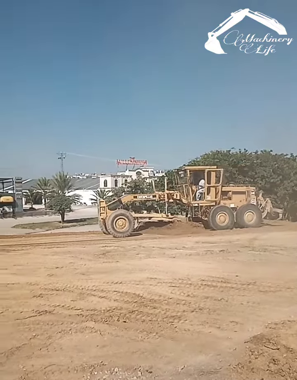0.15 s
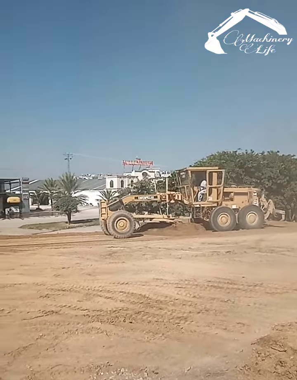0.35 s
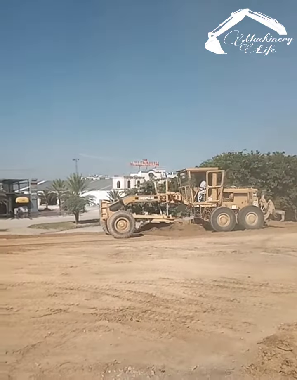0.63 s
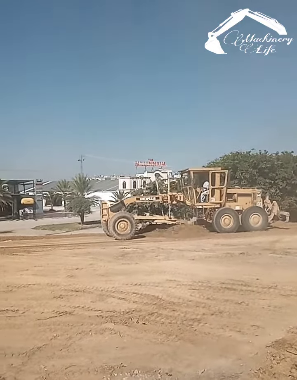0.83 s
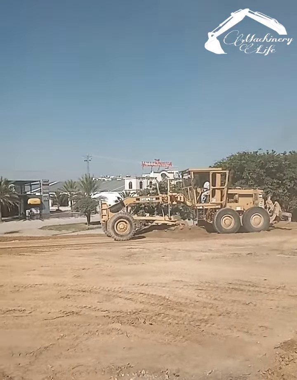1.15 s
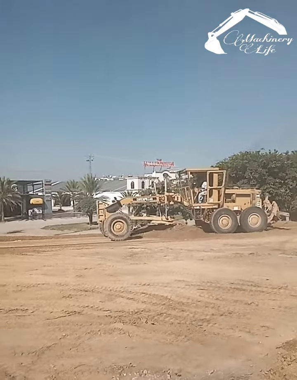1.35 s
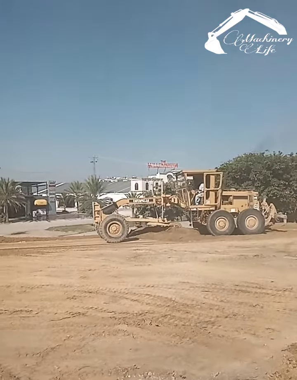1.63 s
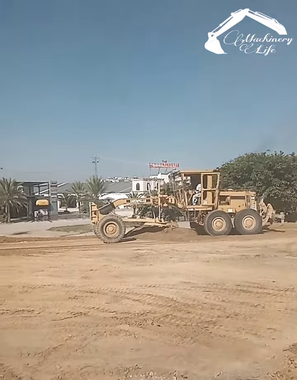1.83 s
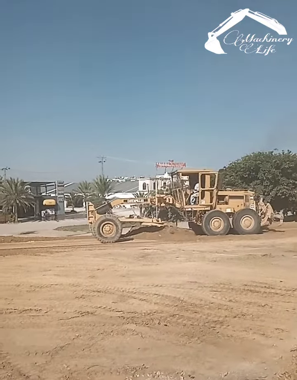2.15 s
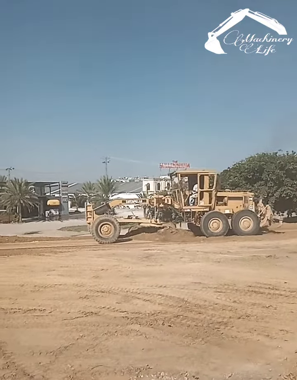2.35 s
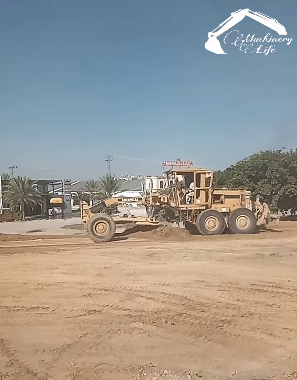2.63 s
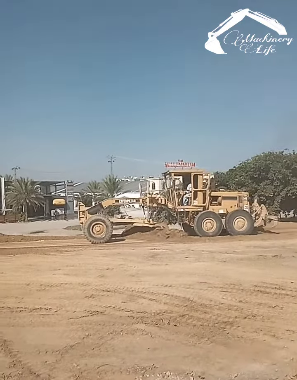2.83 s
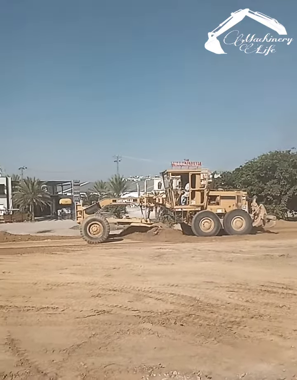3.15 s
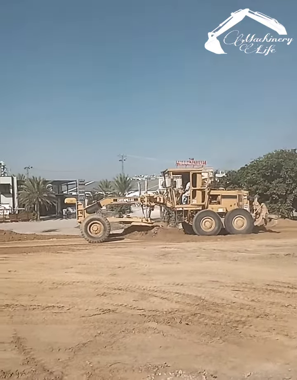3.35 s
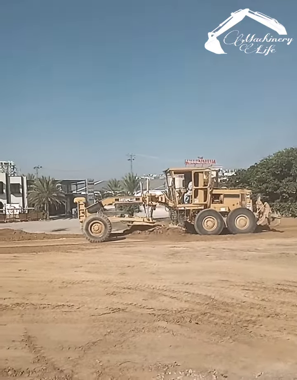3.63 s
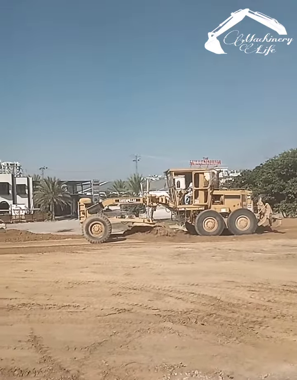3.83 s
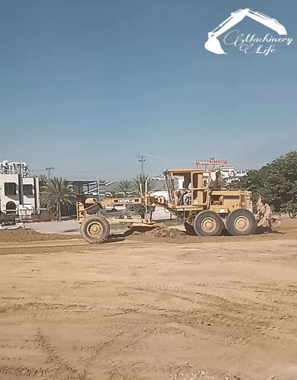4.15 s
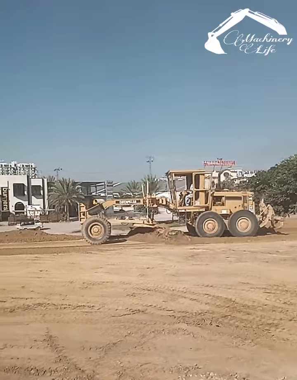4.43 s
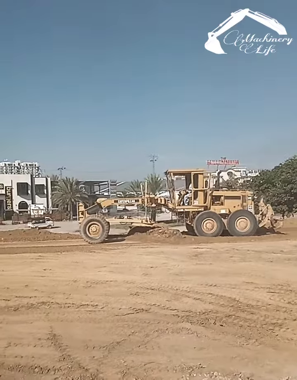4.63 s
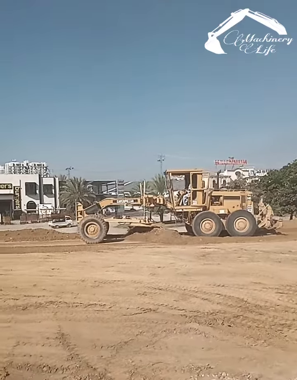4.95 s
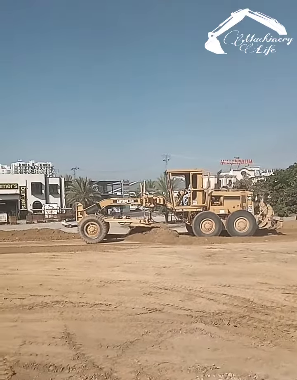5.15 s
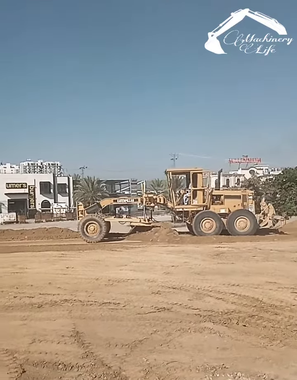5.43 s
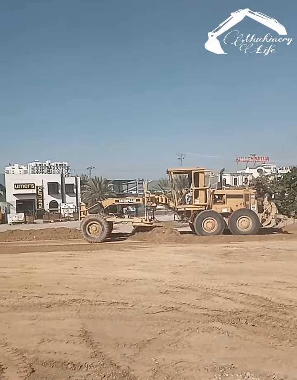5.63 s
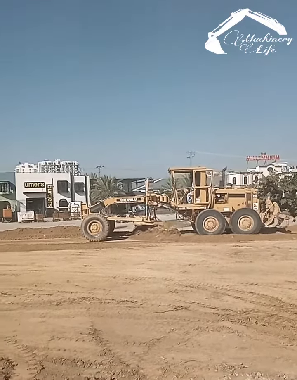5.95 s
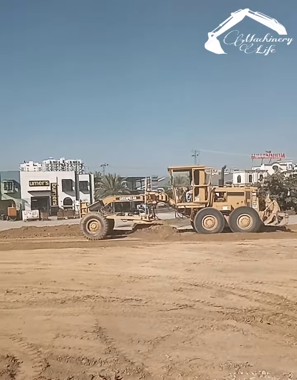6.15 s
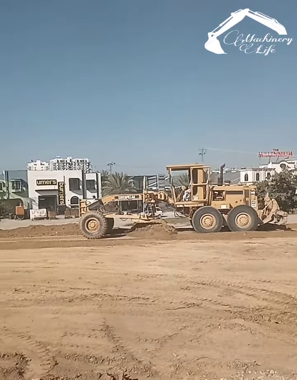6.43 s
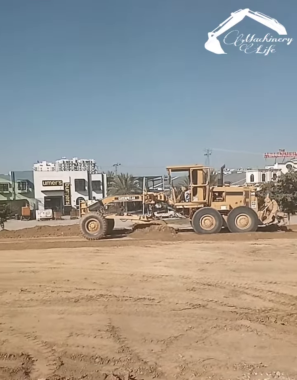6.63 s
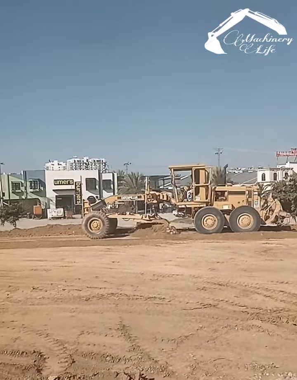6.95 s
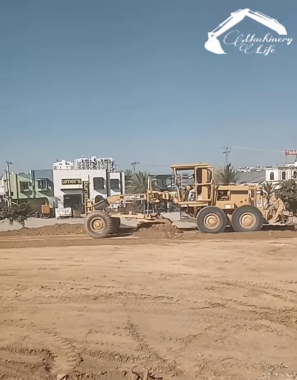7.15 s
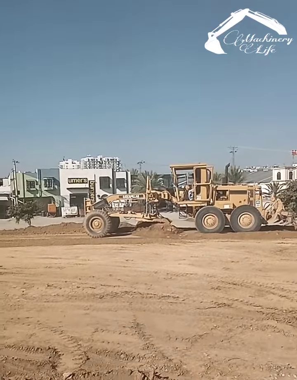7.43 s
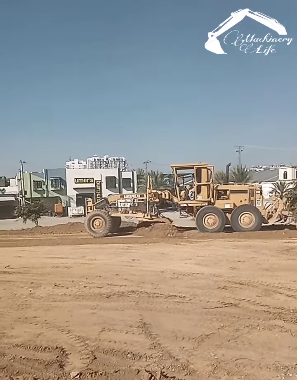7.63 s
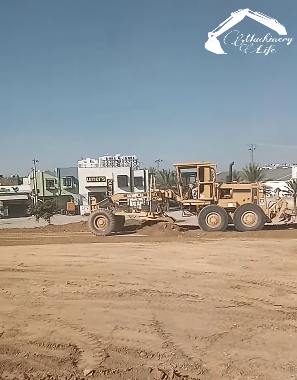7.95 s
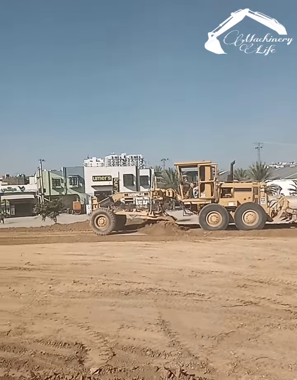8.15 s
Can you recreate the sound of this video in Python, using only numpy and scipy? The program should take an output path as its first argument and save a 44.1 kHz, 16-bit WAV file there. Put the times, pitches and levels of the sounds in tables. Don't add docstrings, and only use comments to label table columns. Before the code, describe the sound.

Road grader working dirt outdoors: dull bass hum and gust bumps at first, suddenly turning into a loud, bright, clattering engine roar that holds steady.

```python
import sys
import numpy as np
from scipy import signal
from scipy.fft import rfft, irfft
from scipy.io import wavfile
from scipy.ndimage import uniform_filter1d

SR = 44100
rng = np.random.default_rng(int(sys.argv[2]) if len(sys.argv) > 2 else 0)


def volts_from_decibels(level):
    exponent = np.asarray(level, float) / 20
    return 10 ** exponent


def log_audio(samples):
    frames = np.atleast_2d(samples).T
    limited = np.clip(frames, -1, 1)
    pcm = np.round(limited * 32767).astype(np.int16)
    wavfile.write(sys.argv[1], SR, pcm)


N = 365148

# frequency in Hz, density in dB per Hz.
HISS_SPECTRUM = [(3000, -8.5), (10700, -3.5), (11400, 8.5), (12000, 0.5), (15200, -4), (16000, -5)]
# frequency in Hz, density in dB per Hz.
RUMBLE_SPECTRUM = [(15, -21), (30, -24), (45, -3), (60, -6), (80, 10), (110, 7.5), (140, -45)]
# start in seconds, peak in dB, first pitch in Hz, length in seconds.
GUST_KNOCKS = [(0.148, -11.5, 356, .011), (0.16, -14.5, 91, 0.024), (1.21, -30, 200, 0.018),
               (1.824, -19, 124, 0.028), (1.908, -10, 255, 0.0063), (1.915, -22, 286, 0.014),
               (1.922, -7.5, 129, 0.024), (2.719, -21, 154, .02), (3.21, -16, 216, .024),
               (3.403, -22, 190, 0.018), (4.533, -15, 130, .02)]
# start in seconds, peak in dB.
GRIT_TICKS = [
    (0.3955, -18),
    (2.797, -21),
    (3.9035, -15),
    (4.0589, -19.5),
]
# time in seconds, firing rate in Hz.
FIRING_RATE = [(0.06, 80.3), (0.89, 78.3), (1.07, 76.0), (1.32, 75.8), (1.59, 81.9), (1.75, 82.8),
               (2.33, 82.9), (2.72, 80.2), (3.28, 80.0), (3.69, 76.4), (4.45, 74.6), (4.7, 74.7),
               (4.88, 80.2), (4.99, 81.4), (8.15, 81.3)]
CYLINDER_DB = [0.5, -6.5, 1, -4.2, -3.5, -15.5]
# time in seconds, clatter level in dB.
FILTER_PASSAGE = [(0, -47), (.35, -48.5), (.62, -56.5), (1.78, -56.5), (2.7, -50.5), (3.0, -53),
                  (4.25, -53), (4.5, -44.5), (4.97, -40), (5.02, -33), (5.13, -31), (5.22, -24.5),
                  (5.32, -27), (5.42, -23.5), (5.75, -24), (6.4, -24.5), (6.7, -23), (8.28, -23)]
FILTER_BAND_HZ = [270, 650, 1700, 2250, 2700, 4000, 6000]
# gain at full grip in dB, exponent of the grip (no unit).
FILTER_BAND_CUT = [(-12, 3.12), (-23, 1.1), (-34.5, 0.94), (-48, 0.99), (-64.5, 0.97), (-62, 0.69),
                   (-62, 0.85)]
# frequency in Hz, density in dB per Hz.
LEAK_SPECTRUM = [(2150, -28.5), (2560, -17), (2760, -7), (2950, -0.5), (3150, 0), (3450, -5), (3750, -18),
                 (4130, -27.5), (4450, -21.5), (4700, -22.5), (5050, -35.5), (5600, -39), (6000, -35.5),
                 (7000, -47.5)]
# frequency in Hz, density in dB per Hz.
HEAD_SPECTRUM = [(1500, -44), (1800, -4.5), (1880, 14), (1925, 17.5), (1990, 11), (2080, -13), (2500, -59)]
# multiple (no unit), level in dB.
ENGINE_ORDERS = [(4, -29), (5, -21.5), (7, -16), (8, -21), (9, -19), (10, -12.5), (12, -20.5), (13, -21.5),
                 (14, -18), (15, -16), (16, -21), (18, -22), (20, -27)]
# frequency in Hz, density in dB per Hz.
ROAR_SPECTRUM = [(56, -35.5), (95, -5.5), (110, -8), (200, -10), (425, -14), (620, -10), (900, -10.5),
                 (1350, -11), (1700, -11), (2100, -10.5), (2550, -13), (3300, -17.5)]
# frequency in Hz, gain in dB.
MIC_TREBLE = [(3300, 3.5), (3900, -7.5), (4300, -8), (4650, -18), (5000, -26), (5620, -35.5), (5880, -33.5),
              (6500, -32), (7300, -44), (7800, -53), (9200, -54.5), (10500, -54.5), (13000, -52),
              (14600, -54)]
# centre in Hz, width in Hz, lift in dB.
PANEL_MODES = [(525, 68, 5), (1097, 120, 4.5), (200, 84, 1)]
# time in seconds, level in dB.
EXHAUST_LEVEL = [(0.0, -27.5), (0.37, -27), (0.64, -30.5), (0.9, -32), (1.2, -29), (1.75, -30.5),
                 (2.05, -29.5), (2.24, -29.5), (2.95, -26.5), (3.2, -29), (4.34, -24.5), (4.54, -20),
                 (4.73, -23.5), (4.93, -23), (5.37, -24.5), (6.11, -22), (8.28, -22.5)]


def in_time(rows, times):
    seconds, values = np.transpose(rows)
    return np.interp(times, seconds, values)


def at_hz(points, hz):
    points_hz, points_db = np.transpose(points)
    return np.interp(np.log(hz + 1), np.log(points_hz), points_db)


def rms_one(x):
    return x / np.sqrt(np.mean(x ** 2) + 1e-20)


def drift(rate_hz):
    pole = np.exp(-2 * np.pi * rate_hz * 40 / SR)
    white = rng.standard_normal(N // 40 + 2002)
    slow = signal.lfilter([1], [1, -2 * pole, pole * pole], white)[2000:]
    return np.interp(np.arange(N) / 40, np.arange(len(slow)), rms_one(slow))


def coloured(x, spectra, peaks=()):
    hz = np.fft.rfftfreq(N, 1 / SR)
    gain = volts_from_decibels(sum(at_hz(points, hz) for points in spectra))
    for centre_hz, width_hz, lift_db in peaks:
        resonance = 1 / (1 + (2 * (hz - centre_hz) / width_hz) ** 2)
        gain = gain * (1 + (volts_from_decibels(lift_db) - 1) * resonance)
    return rms_one(irfft(rfft(x) * gain, N))


def hiss():
    return volts_from_decibels(-94.5) * coloured(rng.standard_normal(N), [HISS_SPECTRUM])


def rumble(note_db):
    lumps = volts_from_decibels(1.2 * drift(5)) * rng.standard_normal(N)
    level_db = -43 + 0.97 * (note_db + 8.5)
    return volts_from_decibels(level_db) * coloured(lumps, [RUMBLE_SPECTRUM])


def knocks():
    end_hz = 83
    out = np.zeros(N)
    for start, peak_db, first_hz, length in GUST_KNOCKS:
        u = np.arange(int(length * SR)) / (length * SR)
        hz = end_hz + (first_hz - end_hz) * np.exp(-2.4 * u)
        envelope = np.sin(np.pi * u ** 0.48)
        swing = envelope * np.sin(2 * np.pi * np.cumsum(hz) / SR)
        out[int(start * SR):][:len(u)] += volts_from_decibels(peak_db) * swing
    return signal.sosfilt(signal.butter(2, 1300, fs=SR, output="sos"), out + 1e-18)


def ticks(fall_hz, lift_db):
    steps = np.zeros(N)
    for start, peak_db in GRIT_TICKS:
        steps[round(start * SR)] = volts_from_decibels(peak_db + lift_db)
    sag = signal.lfilter([1], [1, -np.exp(-2 * np.pi * fall_hz / SR)], steps + 1e-18)
    return signal.sosfilt(signal.butter(7, 3900, fs=SR, output="sos"), sag)


def filter_grip(times):
    open_db, shut_db = -23, -56
    passed_db = in_time(FILTER_PASSAGE, times)
    return np.clip((open_db - passed_db) / (open_db - shut_db), 1e-4, 1.2)


def patchy(frames, spread_db):
    flicker = rng.standard_normal(frames.shape)
    flicker = uniform_filter1d(flicker, size=4, axis=0)
    flicker = uniform_filter1d(flicker, size=3, axis=1)
    return frames * volts_from_decibels(spread_db * rms_one(flicker))


def wind_filter(x, leak_noise):
    hz, times, (frames, passed) = signal.stft([x, leak_noise], SR, nperseg=1024)
    grip = filter_grip(times)
    cut_db = np.array([full_db * grip ** power for full_db, power in FILTER_BAND_CUT])
    bands = np.arange(len(FILTER_BAND_HZ))
    place = np.interp(np.log(hz + 1), np.log(FILTER_BAND_HZ), bands)
    share = np.maximum(1 - abs(place[:, None] - bands), 0)
    gain_db = share @ cut_db
    muffled = patchy(frames * volts_from_decibels(gain_db), 0.8 + 0.041 * abs(gain_db))
    frames = muffled + patchy(passed, spread_db=3.5)
    return signal.istft(frames, SR, nperseg=1024)[1][:N]


def firing_gate(firings, depth, scatter_db):
    stroke = firings.astype(int)
    chance_db = scatter_db * rng.standard_normal(N // 400)[stroke]
    strength_db = np.array(CYLINDER_DB)[stroke % 6] + chance_db
    return 1 + depth * volts_from_decibels(strength_db) * np.exp(-2.5 * (firings % 1))


def leak(firings):
    swell_db = 2.2 * np.cos(2 * np.pi * firings / 6)
    gate = firing_gate(firings, depth=0.64, scatter_db=6.5) * volts_from_decibels(0.53 * drift(15) + swell_db)
    return volts_from_decibels(-64.5) * coloured(gate * rng.standard_normal(N), [LEAK_SPECTRUM])


def ring_level(open_db, cut_db, power, follows, load_db):
    grip = filter_grip(np.arange(N) / SR)
    return open_db + cut_db * grip ** power + follows * load_db


def head_upper_ring(firings, load_db):
    level_db = ring_level(-39, -25.5, power=1.4, follows=1.9, load_db=load_db)
    beat_db = 3.5 * np.cos(2 * np.pi * firings / 6 + 0.4)
    mode = (1999, 1.5 * 82, 60)
    return volts_from_decibels(level_db + beat_db) * coloured(rng.standard_normal(N), [], [mode, mode])


def bonnet_ring(firings, load_db):
    level_db = ring_level(-31, -21, power=1.5, follows=1, load_db=load_db)
    beat_db = 2.2 * np.cos(2 * np.pi * firings / 6 + 1.3)
    mode = (506.3, 1.5 * 45, 45)
    return volts_from_decibels(level_db + beat_db) * coloured(rng.standard_normal(N), [], [mode, mode])


def head_ring(firings, load_db):
    level_db = ring_level(-31, -54, power=1.7, follows=0.9, load_db=load_db)
    swell_db = 1.4 * np.cos(2 * np.pi * firings / 6) + 2.3 * np.cos(2 * np.pi * firings / 3)
    return volts_from_decibels(level_db) * coloured(volts_from_decibels(swell_db) * rng.standard_normal(N), [HEAD_SPECTRUM])


def gear_whine():
    mesh_hz = 1611
    level = np.sqrt(2) * volts_from_decibels(-43.5 + 2.5 * drift(2))
    return level * np.sin(2 * np.pi * mesh_hz * np.arange(N) / SR + 0.8 * drift(14))


def order_tones(firings):
    out = 0
    for multiple, level_db in ENGINE_ORDERS:
        phase = 2 * np.pi * (multiple * firings / 6 + rng.random()) + 0.5 * drift(3.3)
        out = out + volts_from_decibels(level_db + 2.4 * drift(0.4)) * np.sin(phase)
    return np.sqrt(2) * volts_from_decibels(-22) * out


def roar(firings):
    gate = firing_gate(firings, depth=0.38, scatter_db=3.5) * volts_from_decibels(0.45 * drift(18))
    noise = gate * rng.standard_normal(N)
    return volts_from_decibels(-21.5) * coloured(noise, [ROAR_SPECTRUM, MIC_TREBLE], PANEL_MODES)


def exhaust_note(firings, note_db):
    throb_db = 1.2 * np.sin(2 * np.pi * firings / 6) + 0.98 * drift(36)
    level = np.sqrt(2) * volts_from_decibels(note_db + throb_db)
    return level * np.sin(2 * np.pi * firings + 0.27 * drift(8.4))


def scene():
    times = np.arange(N) / SR
    firings = np.cumsum(in_time(FIRING_RATE, times)) / SR
    note_db = in_time(EXHAUST_LEVEL, times)
    load_db = uniform_filter1d(note_db, size=30000) + 22
    near = rumble(note_db) + knocks() + ticks(fall_hz=400, lift_db=2.0)
    clatter = gear_whine() + order_tones(firings) + roar(firings)
    engine = wind_filter(clatter, leak(firings))
    rings = head_upper_ring(firings, load_db) + bonnet_ring(firings, load_db) + head_ring(firings, load_db)
    out = near + engine + rings + exhaust_note(firings, note_db)
    edge_fade = np.clip(np.minimum(times, times[::-1]) / 0.0015, 0.35, 1)
    return (out * edge_fade)[None]


def roll_off(x):
    return signal.sosfilt(signal.butter(12, 15480, fs=SR, output="sos"), x)


def record(dry):
    mix = dry + hiss()
    return roll_off(mix)


dry = scene()
out = record(dry)
log_audio(out)
```